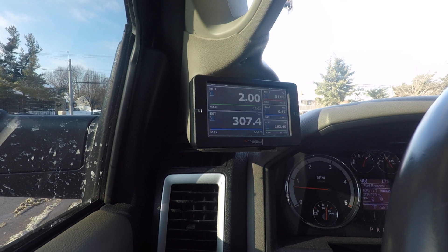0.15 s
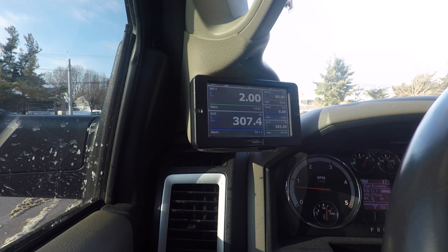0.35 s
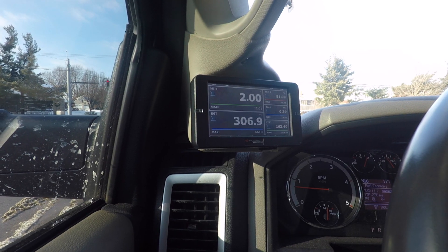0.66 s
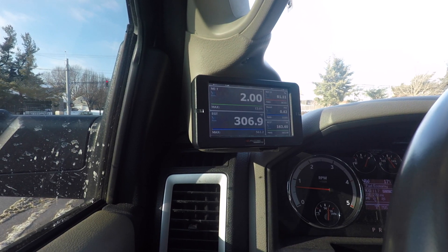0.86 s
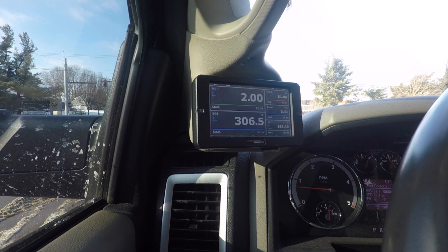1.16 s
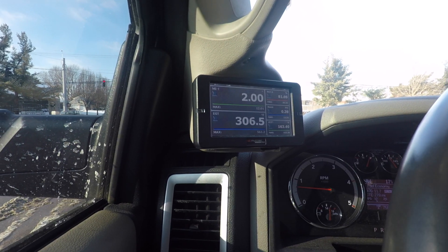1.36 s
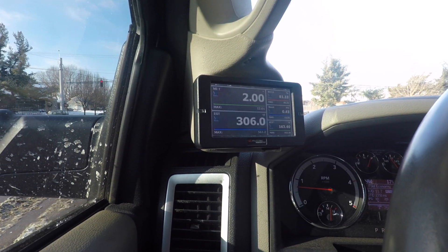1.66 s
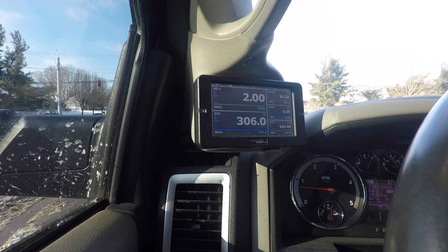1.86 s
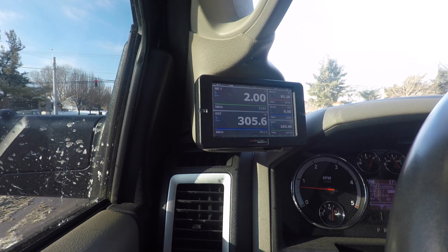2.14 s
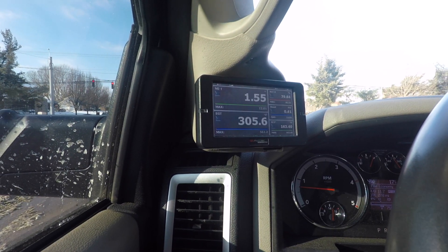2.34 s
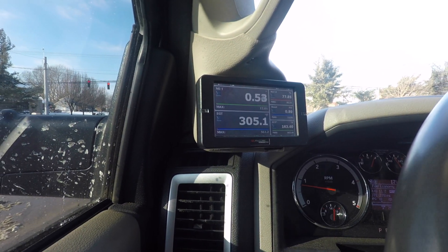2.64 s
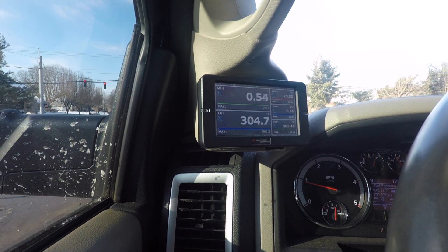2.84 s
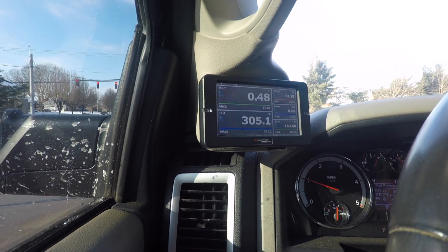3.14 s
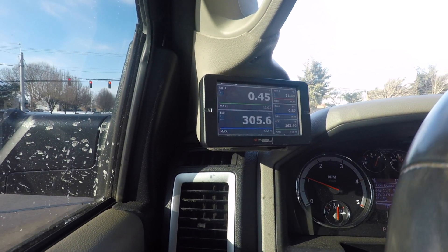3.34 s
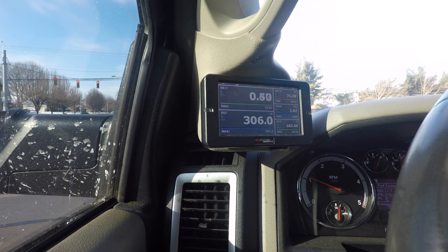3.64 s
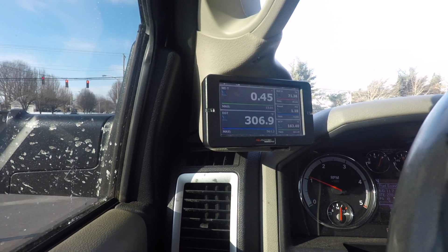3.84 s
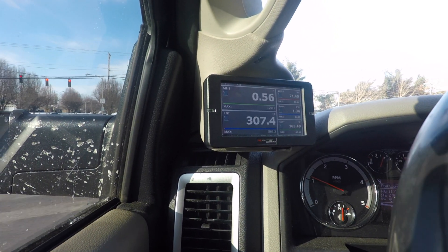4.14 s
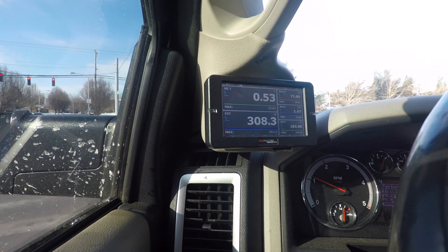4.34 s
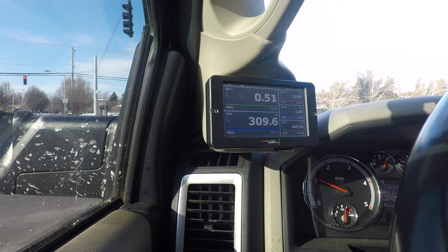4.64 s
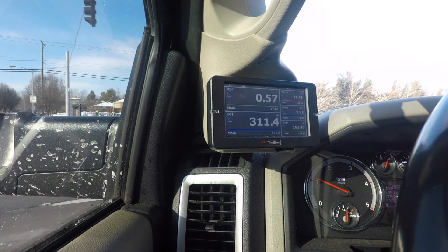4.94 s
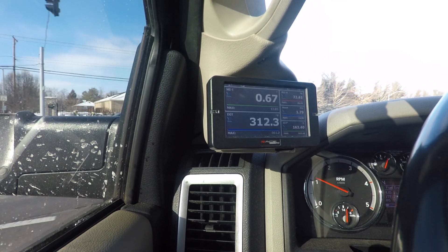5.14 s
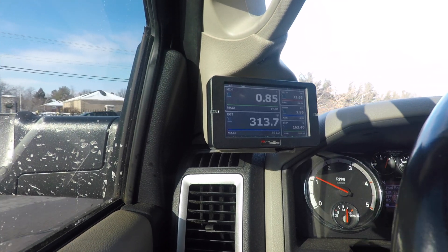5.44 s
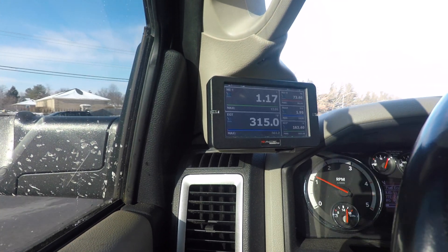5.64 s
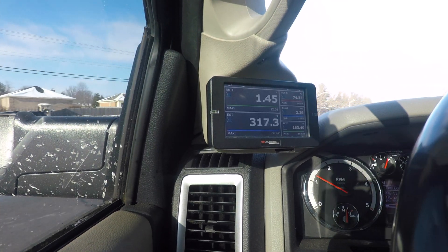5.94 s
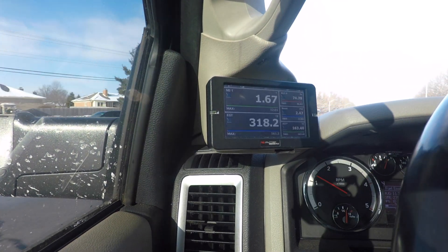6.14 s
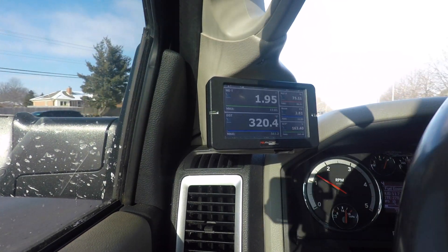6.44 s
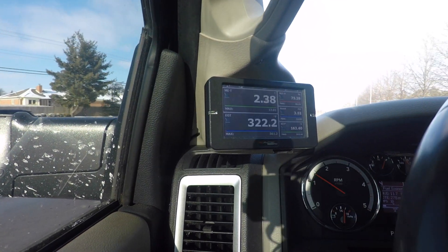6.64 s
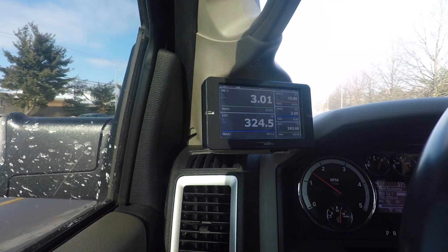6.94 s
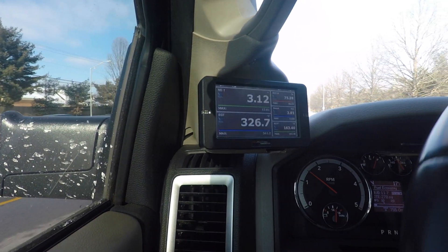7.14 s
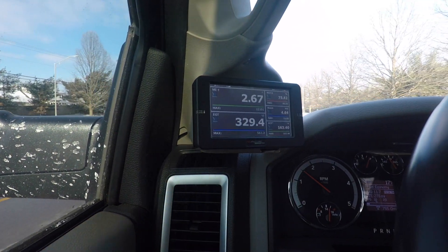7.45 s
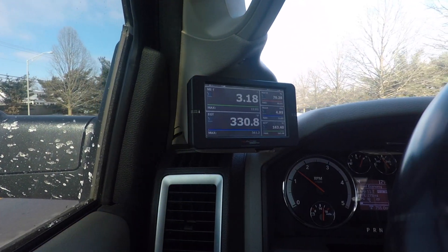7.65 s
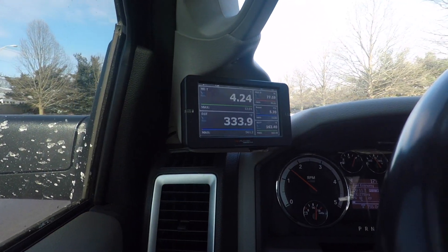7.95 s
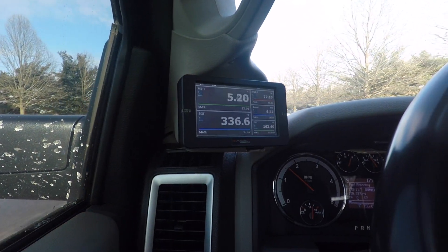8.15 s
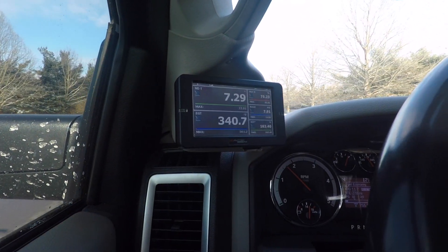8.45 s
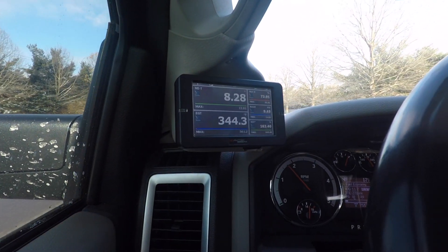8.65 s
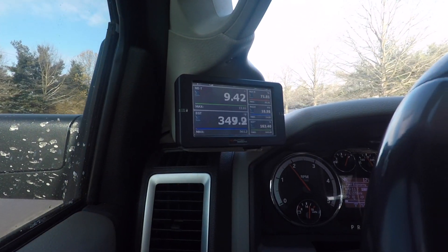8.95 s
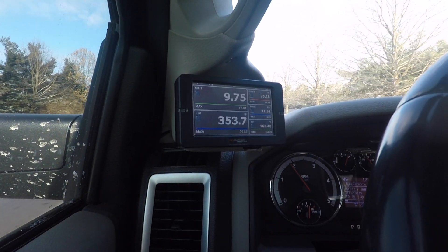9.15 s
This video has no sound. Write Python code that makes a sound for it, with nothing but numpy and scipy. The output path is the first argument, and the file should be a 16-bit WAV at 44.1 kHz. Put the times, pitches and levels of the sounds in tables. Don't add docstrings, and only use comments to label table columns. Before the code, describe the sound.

Close cabin microphone in a diesel truck: a low, even idle with tiny plastic ticks for two seconds, then a quick rise in revs and a deep resonant hum. Dry hand rustle on the steering wheel, creaks and a sharp trim knock follow. The engine pulls harder, eases during a shift, then climbs to its loudest, while the body heaves over bumps and the tyres rumble below.

```python
import sys
import numpy as np
from scipy import signal
from scipy.fft import rfft, irfft, next_fast_len
from scipy.io import wavfile
from scipy.ndimage import uniform_filter1d

SR = 44100
rng = np.random.default_rng(int(sys.argv[2]) if len(sys.argv) > 2 else 0)


def gain_from_db(level_db):
    decades = np.asarray(level_db, float) / 20
    return 10 ** decades


def inscribe(sig):
    pcm = np.round(np.clip(np.atleast_2d(sig).T, -1, 1) * 32767)
    wavfile.write(sys.argv[1], SR, pcm.astype(np.int16))


N = 409688
T = np.arange(N) / SR


def evened(x):
    return x / np.sqrt(np.mean(x ** 2) + 1e-20)


def curves(rows, t=T):
    s, *columns = np.transpose(rows)
    return [np.interp(t, s, c) for c in columns]


def read(points, hz):
    f, db = np.transpose(points)
    return np.interp(np.log(hz), np.log(f), db)


def coloured(x, points):
    f, db = np.transpose(points)
    size = next_fast_len(len(x))
    hz = np.fft.rfftfreq(size, 1 / SR)
    gain = gain_from_db(np.interp(np.log(hz + 1), np.log(f + 1), db))
    return irfft(rfft(x, size) * gain, size)[:len(x)]


def noise(points):
    return evened(coloured(rng.standard_normal(N), points))


def resonate(x, hz, width):
    r = np.exp(-np.pi * width / SR)
    return signal.lfilter([1 - r, 0, r - 1], [1, -2 * r * np.cos(2 * np.pi * hz / SR), r * r], x)


def ring_twice(x, hz, width):
    return resonate(resonate(x, hz, width), hz, width)


def drift(t, rate):
    f, turn = np.geomspace(rate / 12, rate, num=12), rng.random(12)
    return evened((np.sin(2 * np.pi * (f * t[:, None] + turn)) / np.sqrt(f)).sum(axis=1))


def slow_drift(rate):
    return np.interp(T, T[::256], drift(T[::256], rate))


def add(mix, s, sound):
    part = mix[round(s * SR):][:len(sound)]
    part += sound[:len(part)]


# start_s, firing_hz
ENGINE = [(0, 34.8), (2.12, 35.1), (2.38, 45.2), (2.62, 51.5), (3.3, 55.4), (3.95, 56.6), (4.4, 56),
          (4.8, 56.5), (5.3, 59.7), (5.62, 63.4), (6.2, 67.2), (6.67, 72.3), (6.93, 75.9), (7.27, 71.6),
          (7.5, 73.2), (8.33, 86.4), (8.85, 92.4), (9.29, 95.9)]


def cycles():
    return np.cumsum(curves(ENGINE)[0]) / SR / 6


EFFORT_DB = [2, 0.5, 1, 1, 0.5, 0, -0.5, -1, 1, 1, 1, 1, -4, 1, 1, -0.5, -0.5, 2.5]
# multiple_of_cycle_rate, idle_db, load_db
UNEVEN = [(3, -52, -3), (4, -68, -3.5), (5, -50, 9.5), (6, -47.0, -5.5), (7, -57, 3), (8, -74, -2),
          (9, -61, 8.5), (10, -63, 5.5), (11, -78, 4.5), (12, -40.0, 16), (13, -54.5, -8.5), (14, -49, 1.5),
          (15, -63, 8), (16, -80, 5), (17, -42, -0.5), (18, -42.5, -5), (19, -84, -4.5), (20, -59, -6),
          (21, -70, 5.5), (22, -57, -14.5), (23, -48, 3), (24, -49, -7), (25, -54.5, -3), (26, -65, -1.5),
          (27, -84, -4.5), (28, -79, -10), (29, -65, -4), (30, -56.5, -7.5), (31, -60.5, -8.5),
          (32, -63.5, -10)]
# freq_hz, width_hz, level_db
CAB = [(48.7, 12, -47), (76.4, 30, -66), (105.4, 7.4, -41.5), (126, 34, -55), (179.5, 24, -50),
       (225.8, 40, -53.5), (237.7, 36, -53.5), (322.6, 25, -57.5), (351.1, 13, -48.5), (379.5, 60, -68),
       (440, 130, -65.5), (520, 130, -68)]
# freq_hz, width_hz, level_db
BOOMS = [
    (149.5, 10, -40),
    (277, 12, -40),
]
# freq_hz, level_db
FIRING = [(35, -58), (53.5, -31.5), (56, -25.5), (63.5, -16), (67, -27), (74, -33.5), (80, -28.5),
          (95, -25)]
# freq_hz, level_db
OCTAVE = [(70, -42), (96, -34.5), (104, -29.5), (112, -35.5), (115.5, -52.5), (121, -35), (140, -37.5),
          (190, -42.5)]


def mode_power(f, hz, width, db):
    return gain_from_db(db) ** 2 / (1 + (2 * (f - hz) / width) ** 4)


def orders(step=24):
    t, turns = T[::step], cycles()[::step]
    hz = curves(ENGINE, t)[0]
    effort_db = np.interp(t, np.transpose(ENGINE)[0], EFFORT_DB)
    load_db = effort_db + 8.8 * np.log2(hz / hz[0]) - 10.0
    loaded = np.clip((hz / hz[0] - 1.03) / 0.45, 0, 1)

    high = [(k, -63 + 1.5 * (k % 6 == 0), -6.5) for k in range(len(UNEVEN) + 3, 42 + 1)]
    k, idle_db, uneven_db = np.transpose([*UNEVEN, *high])[:, :, None]
    k = np.round(k)
    f = k * hz / 6
    drive = gain_from_db(uneven_db + load_db) ** 2
    cab = drive * sum(mode_power(f, *mode) for mode in CAB)
    booms = drive * sum(mode_power(f, *mode) for mode in BOOMS)
    booms += (k == 18) * drive * mode_power(f, 289.7, 13, -32)
    cab *= gain_from_db([np.minimum(order / 9, 4) * drift(t, 1.5) for order in k]) ** 2

    idle = gain_from_db(idle_db + load_db + 7.5) ** 2
    level = np.sqrt(loaded * (cab + booms) + (1 - loaded) * idle)
    firing = gain_from_db(read(FIRING, hz) + effort_db)
    octave = np.sqrt(gain_from_db(read(OCTAVE, 2 * hz) + effort_db) ** 2 + booms)
    level = np.where(k == 6, firing, np.where(k == 12, octave, level))
    wobble = [rng.random() + 0.0043 * drift(t, 3.4) for _ in k]
    tones = np.sqrt(2) * (level * np.sin(2 * np.pi * (k * turns + wobble))).sum(axis=0)
    return signal.resample_poly(tones, step, 1, window=("kaiser", 12))[:N]


# freq_hz, level_db
CLATTER_COLOUR = [(150, -40), (280, -7), (360, -10), (480, -15), (650, -20), (800, -21), (1010, -27),
                  (1200, -23), (1500, -26), (1720, -33), (2200, -36), (3000, -43.5), (4200, -50),
                  (7000, -76)]


def combustion(turns):
    puff = .9 + np.exp(-(6 * turns % 1) / .6)
    fresh = puff * rng.standard_normal(N)
    repeating = np.interp(turns % 1, np.linspace(0, 1, num=3000), rng.standard_normal(3000))
    return evened(coloured(evened(fresh) + .6 * evened(repeating), CLATTER_COLOUR))


# share_of_cycle, level_db
KNOCK_PATTERN = [(0, 0), (0.162, 3.5), (0.282, -13.5), (.37, -6.5), (.46, -7), (.64, -3), (.81, 0)]
# freq_hz, width_hz, level_db
BLOCK = [(520, 20, -2.5), (723, 70, -3), (817.5, 32, -4.5), (1217, 14, -7), (1305.4, 49, -1)]


def block_knock(turns):
    blows = np.zeros(N)
    for place, db in KNOCK_PATTERN:
        at = np.flatnonzero(np.diff(np.floor(turns - place + 0.02526)))
        late = (at + abs(7.2 * rng.standard_normal(len(at)))).astype(int).clip(0, N - 1)
        blows[late] += gain_from_db(db + 1.5 * rng.standard_normal(len(at)))
    return evened(sum(gain_from_db(db) * evened(ring_twice(blows, hz, w)) for hz, w, db in BLOCK))


# teeth_per_cycle, level_db, start_s, end_s
GEARS = [(84, -20, 0, 2.1), (144, -22, 0, 2.1), (58, -17, 2.7, 5), (79, -12, 3.3, 5.1), (48, -13, 5.2, 6.3),
         (60, -13, 5.2, 6.8), (63, -14, 6.4, 7.25), (66, -19, 5, 6.3), (54, -16, 8, 9.29),
         (78, -17, 8.1, 9), (86, -18, 8.3, 9.2)]


def gear_whine(turns):
    whine = np.zeros(N)
    for teeth, db, start, end in GEARS:
        span = slice(round(start * SR), round(end * SR))
        swell = signal.windows.tukey(len(T[span]), .5) * gain_from_db(db + 2.0 * drift(T[span], 3.9))
        whine[span] += swell * np.sin(2 * np.pi * round(teeth) * turns[span])
    return whine


def clatter():
    turns, hz = cycles(), curves(ENGINE)[0]
    level_db = -61.5 + 7 * np.log2(hz / hz[0]) + 2 * np.maximum(T - 7, 0)
    knock_db = np.interp(T, [2.1, 3, 7, 9], [-5, -11, -13, -20])
    sound = combustion(turns) + gain_from_db(knock_db) * block_knock(turns) + gear_whine(turns)
    return gain_from_db(level_db + 4.5) * sound


PULL_S, PULL_RISE_S = 2.15, .3


def rolling():
    return np.clip((T - PULL_S) / PULL_RISE_S, 0, 1)


# centre_s, level_db, length_s
BUMPS = [
    (2.45, -27.5, 0.42),
    (6.445, -29, 0.3),
    (6.917, -20, 0.25),
    (7.322, -27.5, 0.3),
    (7.629, -30.5, 0.081),
    (7.973, -26.5, 0.13),
    (8.288, -24, 0.25),
    (8.782, -17, 0.24),
    (9.287, -11.5, 0.25),
]


def heave():
    return sum(gain_from_db(db) * np.exp(-(2 * (T - s) / length) ** 2) for s, db, length in BUMPS)


def bounce():
    shake = (1 - rolling()) * gain_from_db(-30) * np.sin(2 * np.pi * 2 * cycles())
    sway = rolling() * gain_from_db(-35 + 0.86 * (T - PULL_S)) + heave()
    mount_hz = 13 * (1 + 0.1022 * slow_drift(0.77))
    return np.sqrt(2) * (shake + sway * np.sin(2 * np.pi * np.cumsum(mount_hz) / SR))


# freq_hz, level_db
ROAD_COLOUR = [(6, -9.5), (16, 0), (28, 6.5), (45, 7.5), (70, 11.5), (110, 0.5), (150, 10.5), (200, 1),
               (300, -11), (400, -11.5), (600, -54)]


def road():
    level = rolling() * gain_from_db(-39.5 + 1.26 * (T - PULL_S)) + gain_from_db(-23.5) * heave()
    return level * gain_from_db(2 * slow_drift(9.0)) * noise(ROAD_COLOUR)


# start_s, peak_db, t60_s, ring_hz
KNOCKS = [
    (1.426, -49, 0.06, 1703),
    (2.694, -47, 0.068, 1800),
    (4.352, -38, 0.087, 520),
    (4.865, -28.5, 0.027, 1020),
    (5.986, -35.5, 0.028, 1160),
    (7.748, -48, 0.055, 1600),
    (8.66, -44, 0.073, 1903),
    (9.158, -39.5, 0.12, 1600),
]
# freq_hz, level_db
KNOCK_COLOUR = [(240, -14.5), (400, 0), (800, 2), (1400, -2.5), (2900, -20), (4500, -29), (7800, -42),
                (13200, -69.5)]


def knocks():
    out, t = np.zeros(N), T[:4000]
    for s, db, t60, hz in KNOCKS:
        z = rng.standard_normal(4000)
        fall = gain_from_db(-60 * t / t60) * np.minimum(t / 0.00038, 1)
        thud = evened(coloured(z, KNOCK_COLOUR) * fall)
        sound = 1.2 * thud + evened(ring_twice(z * fall, hz, 1.3 * hz))
        add(out, s, gain_from_db(db) * sound / abs(sound).max())
    return out


# start_s, peak_db, ring_hz
TICKS = [(0.5613, -46, 5200), (0.5948, -50.5, 4240), (0.6271, -54, 3570), (0.7256, -46.5, 3800),
         (0.573, -50.5, 4200), (1.1951, -51, 5540), (1.2852, -55, 5664), (1.3217, -52.5, 3800),
         (1.3828, -44.5, 3750), (2.365, -55, 3730), (2.4204, -54.5, 4220), (3.3877, -48.5, 3756),
         (3.4577, -49.5, 3757), (3.467, -46, 3400), (3.6046, -43, 3620), (4.1355, -61, 5150),
         (4.1979, -63, 5140), (4.349, -48.5, 3738), (4.4631, -48, 3470), (4.5266, -46, 4100),
         (4.563, -47.5, 3940), (4.8673, -37, 4500), (5.8129, -50, 3904), (6.317, -54.5, 3550),
         (8.6587, -47, 3482), (8.6626, -41.5, 5410), (9.1611, -45, 3660), (9.1645, -41, 3522),
         (9.214, -44.5, 3530), (9.2498, -40, 4560)]
# start_s, gap_s, peak_db, ring_hz, slip_count
CREAKS = [(.79, .024, -51.5, 5000, 6), (.985, .0165, -53.5, 4600, 3), (3.2929, .0265, -50.5, 4200, 4),
          (3.742, .0287, -53, 4100, 3), (3.9239, .0201, -51, 5100, 9)]
# freq_hz, level_db
RUSTLE = [(1470, -0.5), (2500, -2.5), (3660, -9), (7130, -7), (8490, -6), (12700, -12), (14500, -23.5),
          (15500, -32.5)]


def ticks():
    out, t = np.zeros(N), T[:3000]
    runs = [(s + n * gap, db, hz) for s, gap, db, hz, slips in CREAKS for n in range(round(slips))]
    uneven = np.array(runs) + rng.standard_normal((len(runs), 3)) * [.002, 1.5, 400]
    for s, db, hz in [*TICKS, *uneven]:
        t60 = .018 * gain_from_db(0.27 * (db + 53.5))
        fall = gain_from_db(-60 * t / t60) * np.minimum(t / 0.0004, 1)
        snap = coloured(rng.standard_normal(3000), RUSTLE) * fall
        sound = 0.5 * evened(snap) + evened(resonate(snap, hz, 1900))
        add(out, s, gain_from_db(db) * sound / abs(sound).max())
    return out


# start_s, end_s, rustle_db, slips_per_s
HANDS = [(0.54, .8, -95, 50), (1.1, 1.51, -101, 10), (3.2, 3.62, -77, 80), (3.602, 3.9, -75, 35),
         (3.882, 4.3, -72.5, 170), (4.247, 4.663, -80, 50), (5.95, 6.506, -83, 6), (6.657, 7.07, -67, 70),
         (7.0, 7.7, -73.5, 32), (7.6, 8.398, -85, 16), (8.3, 9.4, -88, 20)]


def handling():
    gain, slip_rate = np.zeros(N), np.zeros(N)
    for start, end, db, rate in HANDS:
        held = np.clip(np.minimum(T - start, end - T) / .06, 0, 1)
        gain += held * gain_from_db(db)
        slip_rate += held * rate
    return gain, slip_rate


def rustle():
    grain = gain_from_db(3.3 * evened(uniform_filter1d(rng.standard_normal(N), size=150)))
    return handling()[0] * evened(grain * coloured(rng.standard_normal(N), RUSTLE))


def crackle():
    strength = gain_from_db(4.5 * rng.exponential(1, N).clip(0, 3))
    slips = strength * (rng.random(N) < handling()[1] / SR)
    puff = signal.lfilter([1], [1, -.975], slips) * rng.standard_normal(N)
    return gain_from_db(-61) * resonate(puff, 4800, 2600)


# start_s, level_db
SQUEAK = [(1.5, -100), (1.65, -82), (1.75, -74), (1.9, -80), (2.1, -100)]


def brake_squeak():
    return gain_from_db(curves(SQUEAK)[0]) * evened(ring_twice(rng.standard_normal(N), 4650, 600))


# freq_hz, level_db
FAN = [(88, -32.5), (150, -4.5), (188, -7.5), (320, -5), (445, -24), (840, -30.5), (924, -34),
       (1200, -29.5), (1560, -60), (2640, -120)]


def heater_fan():
    return gain_from_db(-54.5) * noise(FAN)


# freq_hz, level_db
HISS = [(1180, -52.5), (2000, 0), (2290, -4), (3020, -5.5), (4680, -7), (5320, -7), (14500, -13.5),
        (15500, -74)]


def microphone_hiss():
    return gain_from_db(-71.5) * noise(HISS)


def scene():
    engine = orders() + clatter()
    body = bounce() + road() + knocks() + ticks()
    wheel = rustle() + crackle()
    background = brake_squeak() + heater_fan() + microphone_hiss()
    return (engine + body + wheel + background)[None]


def band_limit(x):
    return signal.sosfilt(signal.butter(12, 15690, fs=SR, output="sos"), x)


def record(dry):
    hz, _, z = signal.stft(dry, SR, nperseg=2048)
    top = hz > 12900
    power = abs(z[0]) ** 2
    top_db = 10 * np.log10(power[top].mean(axis=0) + 1e-20)
    above_quiet_db = top_db - np.percentile(top_db, 10)
    frames = z.shape[2]
    patches = rng.standard_normal((33, frames))[np.arange(len(hz)) // 32]
    luck = 1.6 * rng.standard_normal(frames) + 1.3 * patches
    keep_db = .8 + 3 * (hz[:, None] > 15300)
    heavy = power.sum(axis=0) > gain_from_db(-19.5) ** 2
    dropped = top[:, None] & ((.25 * above_quiet_db + luck < keep_db) | heavy)
    thinned = signal.istft(z * np.where(dropped, .03, 1), SR, nperseg=2048)[1][:, :N]
    return band_limit(thinned)


dry = scene()
out = record(dry)
inscribe(out)
```